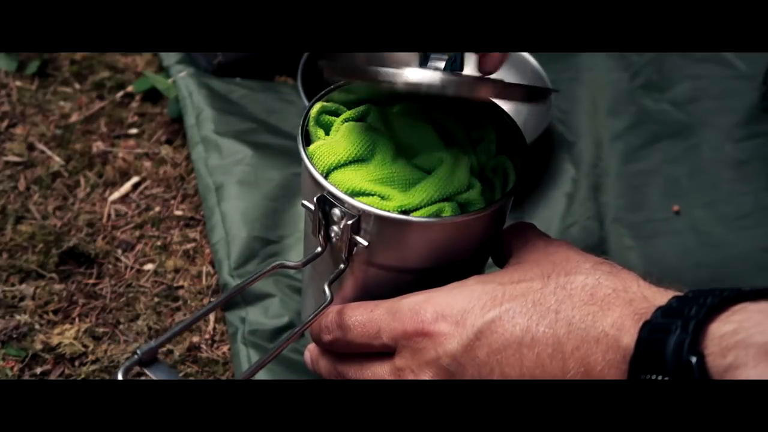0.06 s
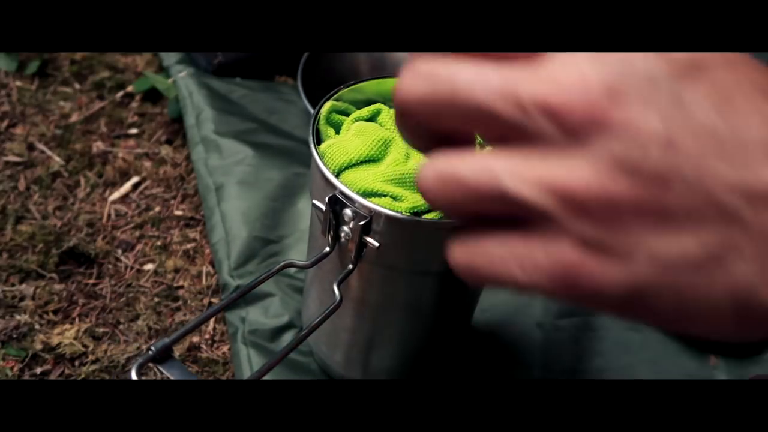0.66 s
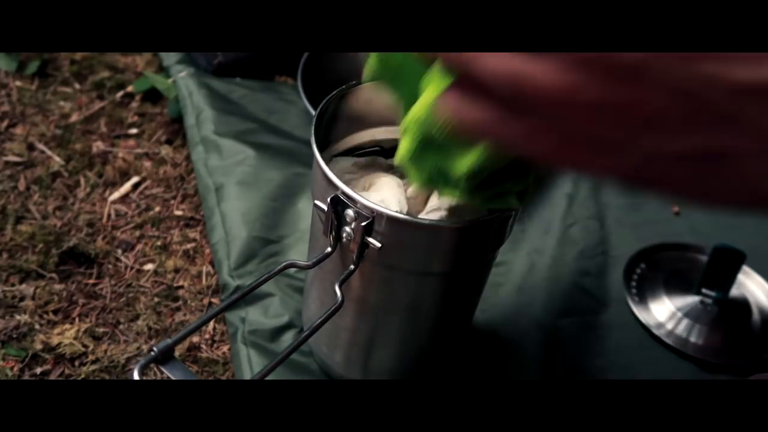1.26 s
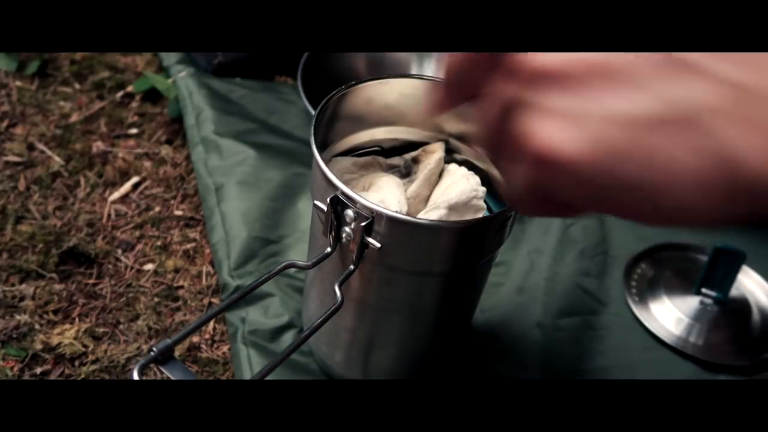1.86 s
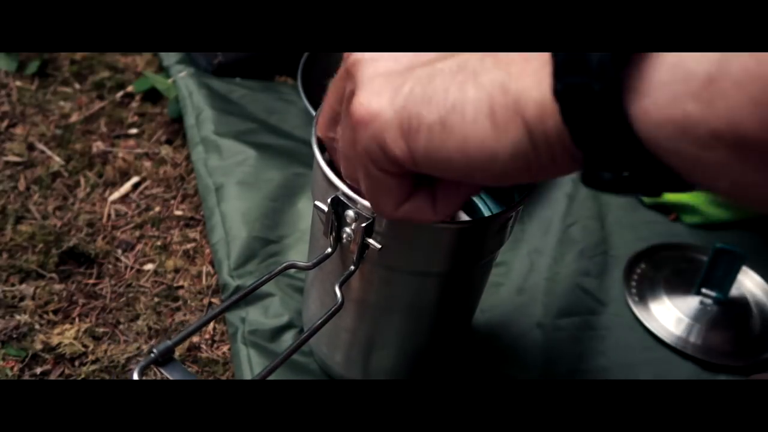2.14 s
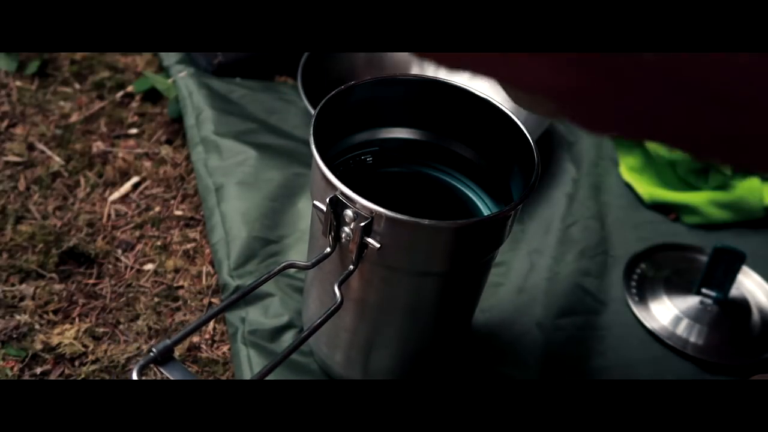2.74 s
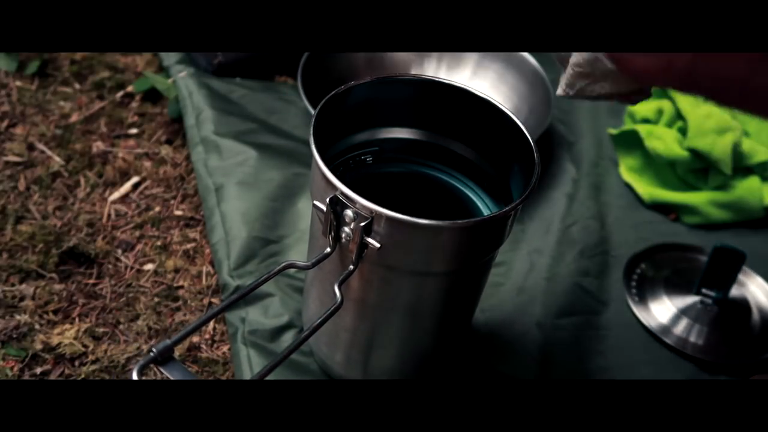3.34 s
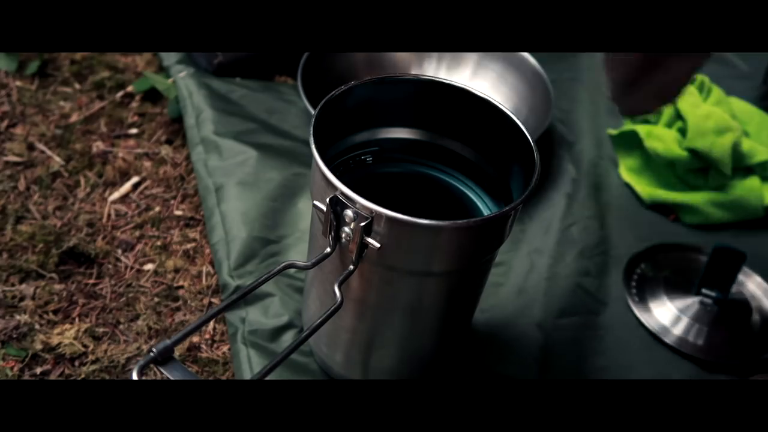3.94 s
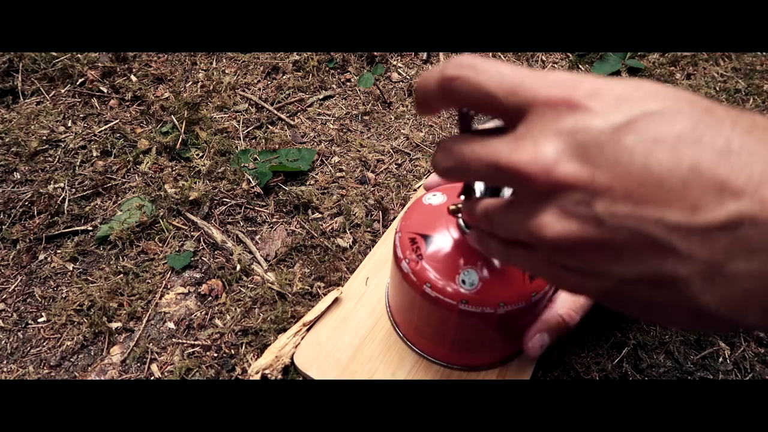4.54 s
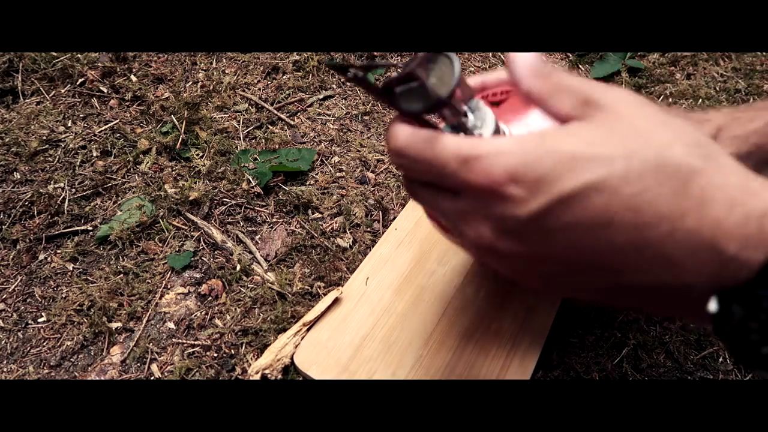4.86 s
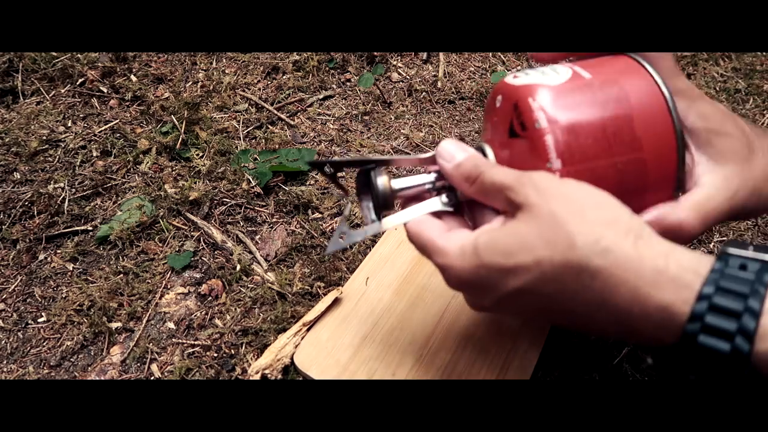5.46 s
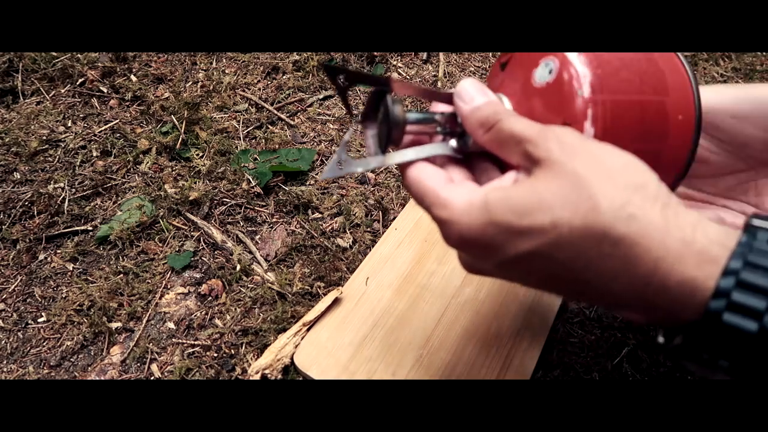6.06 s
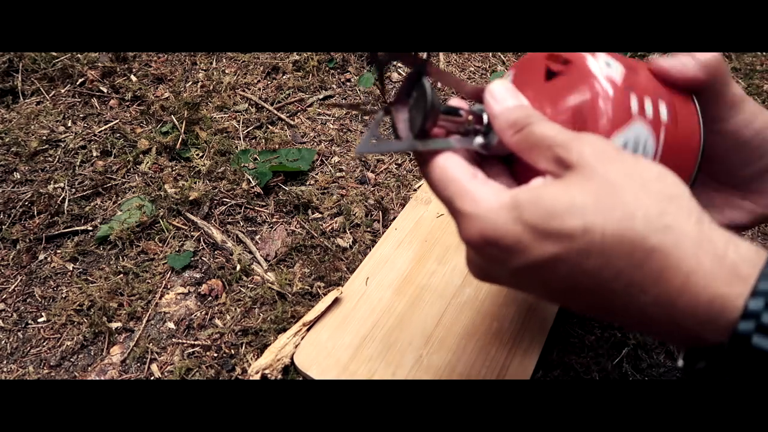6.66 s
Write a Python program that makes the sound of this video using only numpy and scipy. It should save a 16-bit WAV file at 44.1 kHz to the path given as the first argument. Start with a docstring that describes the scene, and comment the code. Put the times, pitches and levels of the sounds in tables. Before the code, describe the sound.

A steel lid rattles along a pot's rim, clinks and rings briefly. A hand rustles softly inside the pot and bumps it with a hollow knock. Then a camp burner clacks loudly onto a gas canister standing on a wooden board and is screwed tight, its thread scraping and squealing thinly. A songbird whistles nearby and small birds twitter further off over soft forest air. The handling is close to a small stereo microphone.

```python
"""In a forest, steel camp cookware is unpacked close to a small stereo microphone.
A lid drags off its pot, clinks and rings, and a hand rummages inside. A burner knocks onto a gas
canister on a wooden board, is lifted and screwed tight, its thread scraping and squealing.
A thrush-like songbird whistles nearby and small birds twitter further off, echoed by the trees,
over soft air and a faint drone."""
import sys
import numpy as np
from scipy import signal
from scipy.fft import rfft, irfft, next_fast_len
from scipy.io import wavfile
from scipy.ndimage import uniform_filter1d

SR = 44100
rng = np.random.default_rng(int(sys.argv[2]) if len(sys.argv) > 2 else 0)


def waveform_to_disk(signal):
    """Save audio, clipped to [-1, 1], as 16-bit WAV at the path in sys.argv[1]."""
    frames = np.transpose(np.atleast_2d(signal))
    scaled = np.clip(frames, -1, 1) * 32767
    samples = np.round(scaled).astype(np.int16)
    wavfile.write(sys.argv[1], SR, samples)


N = 295470
TIME = np.arange(N) / SR
PORT_APART_HZ = 10200  # a mode this high reaches the microphone's two ports well out of step

# Tone of the lid's crack against the rim. Each row: frequency in Hz, level in dB.
LID_CRACK = [(100, -22), (250, -5), (600, 1.5), (900, -22), (2200, 3), (3000, -6), (4600, 3), (7000, -9.5),
             (12000, -6), (15500, -15)]
# Hollow tone of a rubbed vessel. Each row: frequency in Hz, level in dB.
HOLLOW_TONE = [(200, -7), (500, 1.5), (850, -1.5), (1300, -1.5), (2500, -38)]
# Stereo width of sound from close in front. Each row: frequency in Hz, side minus mid in dB.
DIRECT_WIDTH = [(400, -46), (2000, -15), (11000, 1)]
# Stereo width of sound from all around. Each row: frequency in Hz, side minus mid in dB.
DIFFUSE_WIDTH = [(60, -36), (110, -16), (200, -4.5), (400, -2), (4400, -3.5), (15000, 13.5)]


def undb(db):
    """Decibels to gain."""
    return 10 ** (np.asarray(db) / 20)


def unit(x):
    """Scale to rms 1."""
    return x / np.sqrt(np.mean(x ** 2))


def add(out, start, x):
    """Mix x in from start, in seconds."""
    i = max(int(start * SR), 0)
    out[..., i:i + x.shape[-1]] += x[..., :N - i]


def walk(n, hz):
    """Smooth random motion of rms 1, changing about hz times a second."""
    k = max(int(SR / hz), 1)
    return unit(uniform_filter1d(uniform_filter1d(rng.standard_normal(n + 8 * k), k), k))[:n]


def fade(t, t60):
    """Decay of 60 dB in t60 seconds."""
    return np.exp(-np.log(1000) * t / max(t60, 1e-3))


def swells(rows):
    """Smooth rises and falls of pressure, one bell curve a row."""
    return sum(undb(db) * np.exp(-((TIME - middle) / half) ** 2 / 2) for middle, half, db in rows)


def panned(x, pan_db):
    """Left louder than right by pan_db."""
    return x * undb(np.array([[pan_db], [-pan_db]]) / 2)


def blow_level(x, db):
    """Set the rms of the first 10 ms."""
    return x * undb(db) / np.sqrt(np.mean(x[:, :SR // 100] ** 2))


def noise(n, tone, tilt_db=0, width=DIRECT_WIDTH):
    """Coloured stereo noise of rms 1; the two ports agree in the bass and part in the treble."""
    f = np.arange(n // 2 + 1) * SR / n + 1
    hz, db = np.transpose(tone)
    shape_db = np.interp(np.log(f), np.log(hz), db) + tilt_db * np.log2(np.maximum(f, hz[0]))
    low_cut = np.minimum(f / hz[0], 1) ** 2
    mid, side = np.exp(2j * np.pi * rng.random((2, len(f))))
    hz, db = np.transpose(width)
    side_gain = undb(np.interp(np.log(f), np.log(hz), db))
    stereo = (mid + side_gain * side * np.array([[1], [-1]])) / np.hypot(1, side_gain)
    return unit(irfft(undb(shape_db) * low_cut * stereo, n))


def whistle(length, pitches, waver, flutter_db, edge, warble_hz=0):
    """A near-sine gliding through its pitches; a warble, warble_hz deep, shakes pitch and loudness."""
    n = int(max(length, .004) * SR)
    curve = np.polyfit(np.linspace(0, 1, len(pitches)), pitches, len(pitches) - 1)
    glide = np.polyval(curve, np.linspace(0, 1, n))
    warble_rate_hz = 47.6 * (1 + 0.297 * walk(n, 59.8))
    warble = np.sin(2 * np.pi * np.cumsum(warble_rate_hz) / SR) + .5 * walk(n, 200)
    hz = glide * (1 + waver * walk(n, 376)) + warble_hz * warble
    flutter = undb(flutter_db * walk(n, 83) + warble * warble_hz / 50)
    return unit(signal.windows.tukey(n, edge) * flutter * np.sin(2 * np.pi * np.cumsum(hz) / SR))


def struck(blows, modes, crack_tone, crack_t60, tail_db, tail_t60):
    """Each blow rings clear modes and a dense crack of short-lived ones; a grip shortens the ring."""
    # Each blow: start in seconds, ring in dB, crack in dB, ring length factor, tilt in dB per octave.
    # Each mode: frequency in Hz, level in dB, t60 in seconds.
    # Each row of the crack's tone: frequency in Hz, level in dB.
    out, t = np.zeros((2, N)), np.arange(2 ** 15) / SR
    attack = 1 - fade(t, .002)
    crack_decay = fade(t, crack_t60) + undb(tail_db) * fade(t, tail_t60)
    for start, ring_db, crack_db, length, tilt_db in blows:
        ring = 0
        for k, (hz, db, t60) in enumerate(modes):
            skew = rng.standard_normal() * hz / PORT_APART_HZ / 2 * np.array([[1], [-1]])
            gain = (-1) ** k * undb(db + tilt_db * np.log2(hz) + rng.standard_normal())
            ring = ring + gain * fade(t, t60 * length) * np.sin(2 * np.pi * hz * t + skew)
        crack = noise(len(t), crack_tone, tilt_db) * crack_decay
        add(out, start, attack * (blow_level(ring, ring_db) + blow_level(crack, crack_db)))
    return out


def scraped(modes, slips_per_s, drift, favour_db, shifts_per_s=25):
    """Tiny slips ring a part; the moving contact bends each mode and favours now one, now another."""
    t, out = np.arange(2 ** 12) / SR, 0
    slips = rng.standard_normal(N) * (rng.random(N) < slips_per_s / SR)
    for hz, db, t60 in modes:
        ring = signal.fftconvolve(slips, undb(db) * fade(t, t60) * np.sin(2 * np.pi * hz * t))[:N]
        bend = np.exp(2j * np.pi * np.cumsum(hz * drift * walk(N, shifts_per_s)) / SR)
        skew = np.exp(1j * walk(N, shifts_per_s) * hz / PORT_APART_HZ * np.array([[1], [-1]]))
        bent_ring = np.real(signal.hilbert(ring, next_fast_len(N))[:N] * bend * skew)
        out = out + undb(favour_db * walk(N, shifts_per_s)) * bent_ring
    return unit(out)


def lid_clinks():
    """The lid bumps along the pot's rim, comes free and rings on."""
    # Hits and steel modes of the rim and of the lid, with rows as in struck().
    rim_blows = [(0.1188, -32.5, -37, 1, -2.5), (0.1703, -45, -49, 1, -3), (0.186, -36.5, -46, 0.89, -2),
                 (0.1953, -28, -37, 0.62, -4.5), (0.243, -47, -67, 0.72, -8)]
    rim_modes = [(1244, 5.5, 0.098), (1851, -5, 0.15), (4160, -2, 0.065), (4800, 0, 0.065),
                 (7430, -3, 0.085)]
    lid_blows = [(0.1955, -34, -28, 0.99, 0.5), (0.204, -52, -35, 0.57, -2), (0.2806, -68, -48.5, 0.31, -4)]
    lid_modes = [(1060, -14, 0.3), (2083, 4.5, 0.18), (2400, 9, 0.058), (3160, -9.5, 0.7), (3290, -20, 0.7),
                 (4200, 1, .06), (5515, -19.5, 0.9), (7420, -9, .17), (8190, -19, .45), (10340, -14, .28),
                 (11700, -11, .24)]
    rim = struck(rim_blows, rim_modes, LID_CRACK, crack_t60=0.073, tail_db=-29, tail_t60=0.15)
    lid = struck(lid_blows, lid_modes, LID_CRACK, crack_t60=0.047, tail_db=-31, tail_t60=0.69)
    return panned(rim + lid, -1)


def pot_knocks():
    """Knuckles bump the inside of the pot with a low, hollow knock."""
    # The pot's hits, modes and crack tone, with rows as in struck().
    blows = [(2.2175, -26, -37.5, 1.34, 0.5), (2.2405, -39, -44, 1.1, -13)]
    modes = [(383, 4, 0.063), (458, 3.5, 0.071), (672, -4.5, 0.046)]
    crack = [(100, -31), (380, 4.5), (1100, -8.5), (1800, -20.5), (6000, -23), (14000, -49)]
    return struck(blows, modes, crack, crack_t60=0.062, tail_db=-20, tail_t60=0.73)


def canister_on_board():
    """The canister clunks on the wooden board it stands on."""
    # The standing canister's hits, modes and crack tone, with rows as in struck().
    blows = [(4.264, -16, -21.5, 1, 0.5), (4.2695, -18.5, -35, 0.23, -0.5), (4.368, -36.5, -43, 1, 0),
             (4.3855, -21, -25.5, 1, 0.5), (4.408, -48, -23.5, 0.65, 0.5), (4.417, -25.5, -25, 0.53, 1.5),
             (4.4198, -22, -43, 0.56, -4.5), (4.696, -46, -35, 0.57, -4.5), (4.835, -48.5, -47, 0.63, 0.5)]
    modes = [(321, -0.5, 0.046), (400, 0.5, 0.049), (432, 0, 0.034), (481, 6, 0.037), (730, -1, 0.047),
             (850, 1.5, 0.029), (1094, -7, 0.04), (2000, -21, 0.043), (4080, -9, 0.054), (5300, -20, 0.046),
             (6280, -15, 0.022)]
    crack = [(80, -39), (170, -48), (280, -1.5), (550, 2.5), (900, 5), (1600, -1.5), (2800, -14.5),
             (4200, -13), (7500, -16.5), (10200, -25.5), (15500, -54)]
    return panned(struck(blows, modes, crack, crack_t60=0.05, tail_db=-35, tail_t60=0.091), -0.18)


def burner_clacks():
    """The burner hits the valve with short, bright clacks."""
    # The burner's hits, modes and crack tone, with rows as in struck().
    blows = [(4.379, -31.5, -40, 1, -3), (4.417, -25.5, -30.5, 0.29, 0), (4.9235, -50, -37, 1, -1),
             (4.9302, -18, -24.5, 1, 0), (4.9395, -31, -41, 0.4, -2)]
    modes = [(640, -12.5, 0.044), (790, -9.5, 0.07), (1087, -16, 0.093), (2000, 0, 0.011),
             (3460, 9.5, 0.0086), (3890, -0.5, 0.028), (3980, -3, 0.025), (5770, -5.5, 0.031),
             (6150, -7, 0.039), (8300, -17, 0.042), (10120, -19, 0.043)]
    crack = [(100, -15), (350, 2.5), (800, 2.5), (1400, -8.5), (3500, -4), (5000, -7), (8000, -10.5),
             (12500, -17), (15500, -27)]
    return panned(struck(blows, modes, crack, crack_t60=0.041, tail_db=-25, tail_t60=0.22), -1.2)


def canister_in_hand():
    """Knocks ring the canister briefly while it is held."""
    # The held canister's hits, modes and crack tone, with rows as in struck().
    blows = [(5.7658, -24, -29, 0.79, 3), (5.834, -41, -42, 0.33, -1), (6.021, -39, -49, 0.56, 3)]
    modes = [(830, 6, 0.026), (924, 2, 0.03), (1073, -19.5, 0.25), (1174, -16, 0.073), (1325, -3, 0.025),
             (4950, -18, 0.063), (5200, -21, 0.035), (5950, -25, 0.039)]
    crack = [(100, -1), (450, -3), (950, 11), (2200, -14), (5500, -20), (7000, -23), (12000, -36),
             (15500, -41)]
    return panned(struck(blows, modes, crack, crack_t60=0.017, tail_db=-18, tail_t60=0.14), -3)


def lid_drag():
    """The lid's edge rattles along the rim between its clinks."""
    # Drags over the rim. Each row: middle in seconds, half length in seconds, level in dB.
    drags = [(0.183, 0.016, -43), (0.216, 0.025, -49.5), (0.277, 0.0084, -45.5)]
    # The rattle's modes. Each row: frequency in Hz, level in dB, t60 in seconds.
    modes = [(1043, 1.5, 0.057), (1254, -5, .05), (1910, 1, 0.061), (3760, 1.5, 0.033)]
    chatter = unit(undb(4.7 * walk(N, 300))) * noise(N, LID_CRACK, tilt_db=3)
    rattle = scraped(modes, slips_per_s=400, drift=0.0199, favour_db=-0.5)
    return swells(drags) * (rattle + undb(-10.5) * chatter)


def taps_and_click():
    """Dull light taps, and one sharp click where the birdsong breaks off."""
    # Noise bursts. Each row: start in seconds, level in dB, tilt in dB per octave, t60 in seconds.
    bursts = [(0.814, -49, -1, 0.097), (1.955, -49, -1, 0.089), (3.616, -39.5, -11, 0.13),
              (3.86, -45, -5, 0.024), (4.0182, -49, -0.5, 0.0095)]
    # Their tone. Each row: frequency in Hz, level in dB.
    tone = [(30, -26), (80, -8), (300, 1.5), (800, -2.5), (4000, -7), (14000, -26)]
    out, t = np.zeros((2, N)), np.arange(2 ** 13) / SR
    for start, db, tilt_db, t60 in bursts:
        envelope = fade(t, t60) * (1 - fade(t, t60 / 10))
        add(out, start, blow_level(noise(len(t), tone, tilt_db) * envelope, db))
    return out


def rummaging():
    """Fingers and cloth brush the inside of the pot in a hollow, uneven rustle."""
    # Brush strokes. Each row: middle in seconds, half length in seconds, level in dB.
    brushes = [(0.798, 0.04, -55), (0.891, 0.0088, -51), (1.958, 0.023, -55), (2.197, 0.09, -55),
               (2.52, 0.12, -58)]
    return swells(brushes) * unit(undb(4 * walk(N, 90))) * noise(N, HOLLOW_TONE)


def screwing(grit_per_s=130, grit_t60=.004):
    """Each twist scrapes: tiny slips ring the burner, the canister sounds hollow; palms only hiss."""
    # Twists that screw the canister on. Each row: middle and half length in seconds,
    # then hiss, burner ring and canister body in dB.
    twists = [(5.313, 0.046, -54, -54.5, -69), (5.67, 0.025, -53.5, -47.5, -50),
              (5.719, .014, -60, -50.5, -56.5), (5.963, 0.0028, -58, -54, -69),
              (6.026, 0.032, -53, -51, -51), (6.083, 0.014, -45.5, -52, -58), (6.431, 0.044, -50, -51, -54)]
    # Palms sliding to a new grip. Each row: middle in seconds, half length in seconds, level in dB.
    slides = [(3.247, 0.025, -58), (3.88, 0.019, -57), (5.106, 0.07, -58.5), (5.56, 0.033, -57.5),
              (6.237, 0.2, -61), (6.675, 0.028, -55.5)]
    # Scraping hiss. Each row: frequency in Hz, level in dB.
    hiss_tone = [(1500, 0.5), (3000, -1.5), (6000, 1), (7200, -3.5), (12700, -5.5), (14500, -28)]
    # The burner as its thread scrapes. Each row: frequency in Hz, level in dB, t60 in seconds.
    thread_modes = [(4300, -1, 0.0047), (5680, -1.5, 0.016), (6090, -0.5, 0.017), (7820, -6.5, 0.015),
                    (8740, -6, .008), (9980, -9, 0.0089)]
    middles, halves, *levels = np.transpose(twists)
    hiss, ring, body = (swells(zip(middles, halves, db)) for db in levels)
    # The thread catches and frees unevenly; single rough spots let go and tick in the metal.
    ticks = rng.exponential(size=N) * (rng.random(N) < grit_per_s / SR)
    grit = signal.lfilter([1], [1, -fade(1 / SR, grit_t60)], ticks)
    grain = unit(undb(1.2 * walk(N, 70) + 3.2 * walk(N, 1500)) + grit / 2)
    metal = unit((1 + 2 * grit) * scraped(thread_modes, slips_per_s=1100, drift=.014, favour_db=3))
    friction = (hiss + swells(slides)) * noise(N, hiss_tone) + body * noise(N, HOLLOW_TONE)
    return panned(grain * friction + ring * metal, -1.6)


def squeaks():
    """The thread catches and slips at the pitch of the part that gives."""
    # Metal on metal. Each row: start and length in seconds, first and last pitch in Hz, level in dB.
    slips = [(4.3755, 0.013, 4250, 3990, -26), (5.663, 0.012, 6050, 5500, -47),
             (4.683, 0.0186, 698, 765, -35), (6.069, 0.0278, 6000, 4900, -43.5)]
    out = np.zeros(N)
    for start, length, first_hz, last_hz, db in slips:
        squeak = whistle(length, [first_hz, last_hz], waver=0.025, flutter_db=3, edge=0.59)
        add(out, start, undb(db) * squeak)
    return out


def squeal(start=6.1, length=0.29, sag=0.079):
    """The tightening thread sings thinly in several hoarse partials that sink together."""
    # The thread's partials. Each row: middle pitch in Hz, level in dB.
    partials = [(4100, -55.5), (5650, -66.5), (7750, -68), (12700, -69.5)]
    out = np.zeros((2, N))
    for hz, db in partials:
        pitches = [hz * (1 + sag), hz, hz * (1 - sag / 2)]
        ports = [whistle(length, pitches, waver=.032, flutter_db=5, edge=0.15) for _ in range(2)]
        add(out, start, undb(db) * np.array(ports))
    return out


def tree_echo(call, width, t60, build_s, patchy_db, patches_per_s):
    """Trunks scatter a call into a patchy echo that builds and fades."""
    t = np.arange(SR) / SR
    scatter = noise(SR, [(100, 1.5), (10000, 2.9)], width=width)
    patches = undb(patchy_db * walk(SR, patches_per_s))
    response = unit(scatter * patches * fade(t, t60) * (1 - fade(t, build_s))) / np.sqrt(SR)
    return signal.fftconvolve(call[None], response, axes=1)[:, :N]


def songbird(break_s=4.02, echo_db=-4.5):
    """A clear whistled song with a blurred echo; the first phrase breaks off abruptly, echo and all."""
    # The song. Each row: start and length in seconds, middle pitch in Hz, level in dB, syllable.
    song = [(2.72, 0.06, 2600, -60.5, "sink"), (2.765, 0.13, 2120, -53, "held"),
            (2.951, 0.042, 2540, -59.5, "rise"), (2.958, 0.15, 1677, -54, "slur"),
            (3.076, .11, 1980, -48, "trill"), (3.239, 0.12, 2430, -40, "arch"),
            (3.38, 0.061, 1876, -46, "held"), (3.559, 0.14, 1680, -50, "trill"),
            (3.734, 0.05, 2697, -51, "held"), (3.748, 0.11, 2294, -39, "sink"),
            (3.853, .12, 2274, -43, "trill"), (3.965, 0.057, 2454, -39.5, "held"),
            (4.01, 0.11, 1672, -53, "trill"), (4.187, 0.033, 2430, -49, "sink"),
            (4.207, 0.11, 2006, -47.5, "held"), (4.443, .13, 1648, -45, "slur"),
            (4.665, 0.11, 1785, -49, "rise"), (4.714, 0.19, 1845, -44, "hook"),
            (4.981, 0.078, 3140, -44, "hook"), (5.179, 0.153, 1686, -50.5, "rise"),
            (5.286, 0.19, 1681, -46.5, "purl"), (5.584, .11, 2520, -46, "hook"),
            (5.897, 0.098, 2394, -46.5, "arch"), (5.908, 0.055, 3020, -54, "rise"),
            (5.95, 0.11, 1879, -43, "slur"), (6.135, 0.071, 1605, -49, "rise"),
            (6.182, 0.1, 1838, -47, "arch")]
    # Syllable shapes. Each entry: first and last pitch as ratios to the middle, warble depth in Hz.
    syllables = {"held": (0.98, 1.012, 0), "sink": (1.035, 0.97, 0), "slur": (1.2, .94, 38),
                 "rise": (.92, 1.04, 0), "arch": (0.97, 0.94, 2.6), "hook": (0.94, .82, 23),
                 "trill": (0.87, 0.93, 95), "purl": (1.07, .92, 105)}
    first, second = np.zeros((2, 2, N))
    for start, length, hz, db, syllable in song:
        first_ratio, last_ratio, warble_hz = syllables[syllable]
        pitches = [first_ratio * hz, hz, last_ratio * hz]
        clear = whistle(length, pitches, waver=.004, flutter_db=1, edge=.35, warble_hz=warble_hz)
        blurred = whistle(length, pitches, waver=.022, flutter_db=3, edge=.35, warble_hz=warble_hz)
        phrase = first if start < break_s - length / 2 else second
        add(phrase, start, undb(db) * np.array([clear, blurred]))
    phrases = []
    for clear, blurred in (first, second):
        echo = tree_echo(blurred, DIRECT_WIDTH, t60=0.99, build_s=0.03, patchy_db=1.5, patches_per_s=36)
        phrases.append(clear + undb(echo_db) * echo)
    return panned(phrases[0] * (TIME < break_s) + phrases[1], -1.1)


def peeps(start=6.445, count=11, every_s=.022, centre_hz=4520, spread_octaves=0.21):
    """A small bird's quick run of tiny arched peeps, each at its own pitch and strength."""
    out = np.zeros(N)
    for k, (late, height, slope, force) in enumerate(rng.uniform(-0.92, 1, (count, 4))):
        arch = np.array([-1 - slope, 0, -1 + slope])
        pitches = centre_hz * 2 ** (spread_octaves * (height + arch))
        peep = whistle(0.01, pitches, waver=.05, flutter_db=3, edge=.7)
        add(out, start + (k + late / 2) * every_s, undb(-58 + 3.4 * force) * peep)
    return out


def far_birds(chirp_s=.048, every_s=.09, step_db=-2, echo_db=0.5):
    """Small birds twitter far off, in fading runs of chirps that bounce back from single trunks."""
    # Runs. Each row: start in seconds, number of chirps, first pitch in Hz, level in dB, chirp shape.
    runs = [(0.415, 1, 6640, -59, "thin"), (0.49, 2, 7670, -63.5, "thin"), (.7, 2, 8040, -64, "thin"),
            (1.045, 1, 4600, -55, "down"), (1.155, 2, 3596, -56.5, "down"), (1.425, 1, 5250, -55, "down"),
            (1.533, 2, 5640, -54, "down"), (1.825, 1, 6570, -64, "down"), (2.858, 1, 3400, -60, "up"),
            (2.925, 3, 4030, -60.5, "dip"), (3.113, 1, 3330, -56, "up"), (3.195, 3, 4030, -57.5, "dip"),
            (3.51, 1, 3700, -57.5, "down"), (3.678, 1, 3600, -52, "down"), (4.06, 2, 4080, -52.5, "down"),
            (4.5, 1, 4300, -52, "down"), (4.58, 1, 4480, -53, "thin"), (4.64, 3, 5630, -58, "thin"),
            (4.722, 1, 3730, -49, "down"), (6.364, 1, 2595, -57, "up"), (6.56, 1, 4640, -58.5, "down")]
    # Chirp shapes. Each entry: sweep in octaves, share of it done half-way, direct sound in dB,
    # step to the next chirp in octaves.
    shapes = {"down": (-.52, .5, -6.5, -.32), "up": (.41, 0.9, -1, 0), "thin": (-.13, 0.52, -8, -.07),
              "dip": (-.23, .8, -4, 0)}
    echo_send, direct = np.zeros((2, N))
    for start, count, first_hz, db, shape in runs:
        sweep, bend, direct_db, step = shapes[shape]
        for k in range(count):
            pitches = first_hz * 2 ** (k * step + sweep * np.array([0, bend, 1]))
            chirp = undb(db + k * step_db) * whistle(chirp_s, pitches, waver=.035, flutter_db=4, edge=.4)
            add(echo_send, start + k * every_s, chirp)
            add(direct, start + k * every_s, undb(direct_db) * chirp)
    peep_run = peeps()
    echo = tree_echo(echo_send + peep_run, DIFFUSE_WIDTH,
                     t60=0.95, build_s=0.023, patchy_db=4.5, patches_per_s=1500)
    return peep_run + direct + undb(echo_db) * echo


def forest_air():
    """Soft, gently swaying air from all sides with a faint far-off drone."""
    # Tone of the air. Each row: frequency in Hz, level in dB.
    tone = [(15, -35), (25, -6.5), (59, 1), (154, -5), (278, -4.5), (709, -11.5), (1280, -15.5),
            (1720, -16.5), (2240, -13.5), (2780, -17), (7480, -25.5), (15000, -39)]
    # Its slow rise and fall. Each row: time in seconds, level in dB.
    levels = [(0, -55.5), (.6, -52.5), (4, -51.5), (6.7, -53.5)]
    air = noise(N, tone, width=DIFFUSE_WIDTH)
    air_db = np.interp(TIME, *np.transpose(levels)) + 0.5 * walk(N, 5.8)
    drone_hz = 102.3 * (1 + 0.0174 * walk(N, 8.2))
    drone = np.sin(2 * np.pi * np.cumsum(drone_hz) / SR) * undb(2 * walk(N, 3.6))
    return undb(air_db) * air + undb(-64) * unit(drone)


def scene():
    """Handling in front, birds and air behind."""
    hits = lid_clinks() + pot_knocks() + canister_on_board() + burner_clacks() + canister_in_hand()
    details = lid_drag() + taps_and_click() + rummaging() + screwing() + squeaks() + squeal()
    return hits + details + far_birds() + songbird() + forest_air()


def record(dry):
    """Sound reaches the left port a moment after the right; the recorder cuts the top."""
    lag_samples, top_hz = 0.74, 15300
    delay = np.exp(-2j * np.pi * lag_samples * np.arange(N // 2 + 1) / N)
    left = irfft(rfft(dry[0]) * delay, N)
    low_pass = signal.ellip(8, .2, 80, top_hz, fs=SR, output="sos")
    return signal.sosfilt(low_pass, np.array([left, dry[1]]))


dry = scene()
out = record(dry)
waveform_to_disk(out)
```